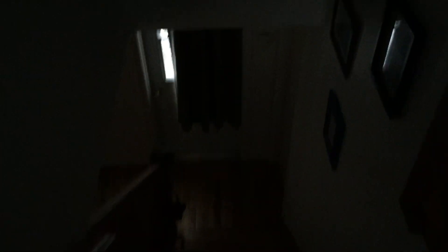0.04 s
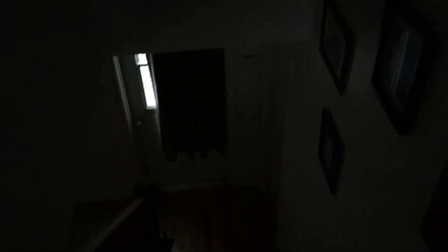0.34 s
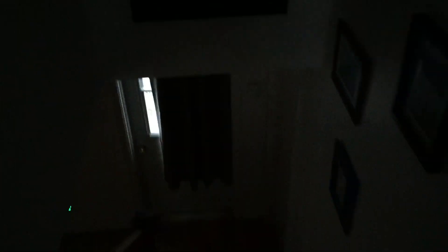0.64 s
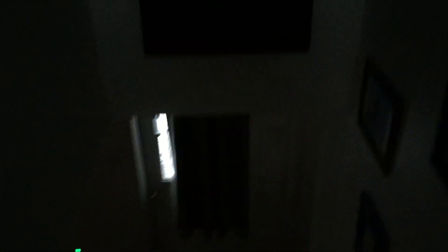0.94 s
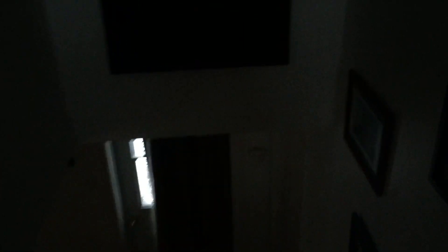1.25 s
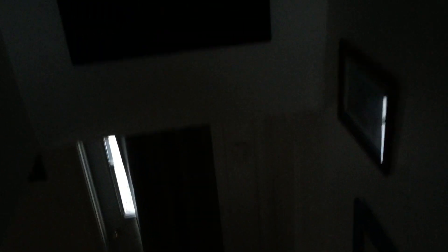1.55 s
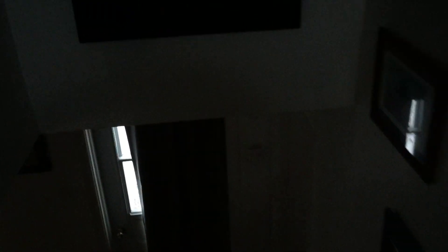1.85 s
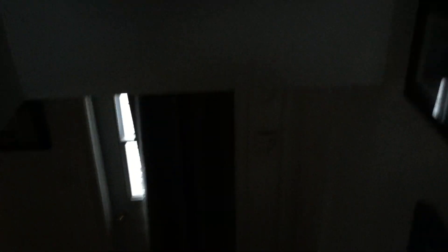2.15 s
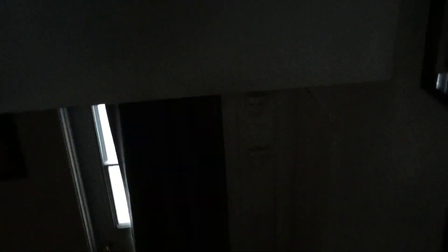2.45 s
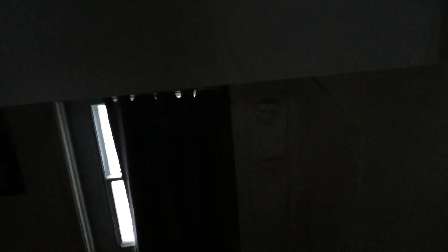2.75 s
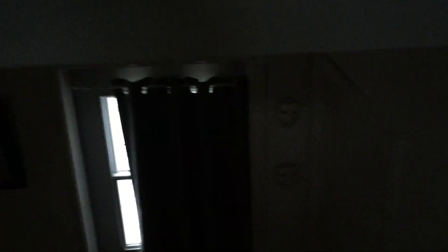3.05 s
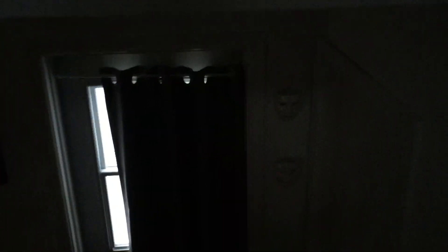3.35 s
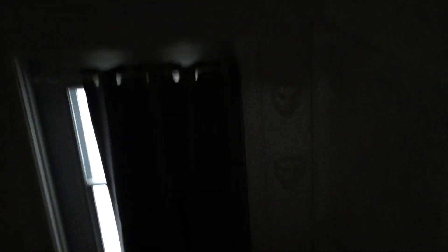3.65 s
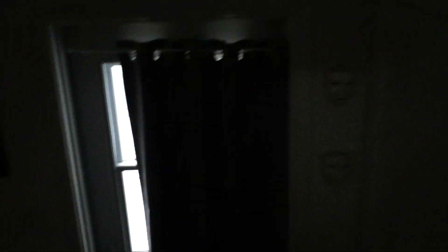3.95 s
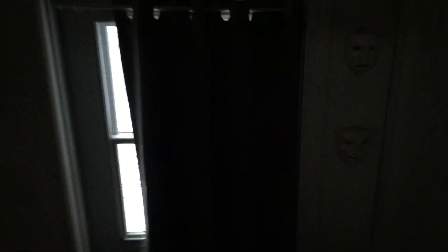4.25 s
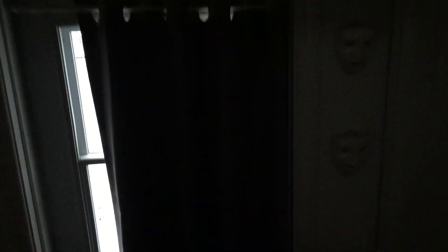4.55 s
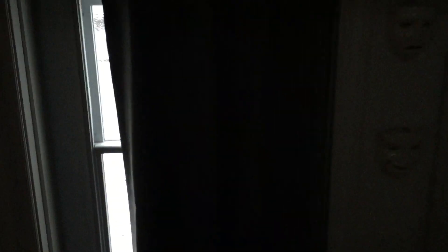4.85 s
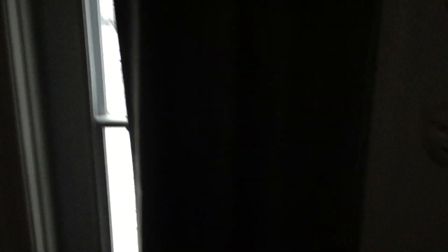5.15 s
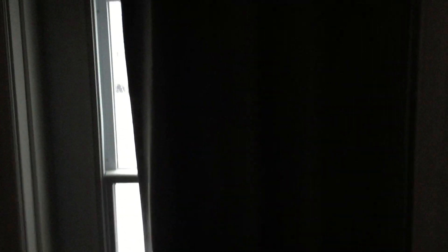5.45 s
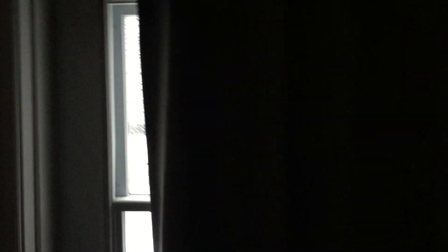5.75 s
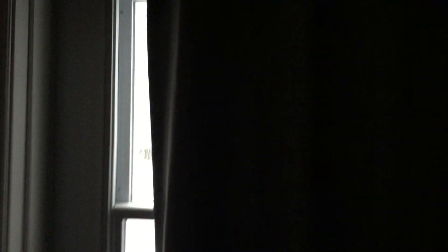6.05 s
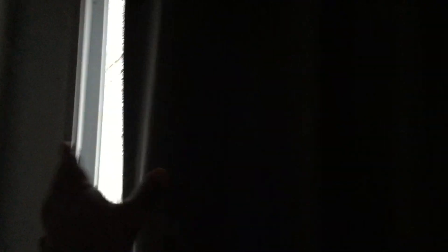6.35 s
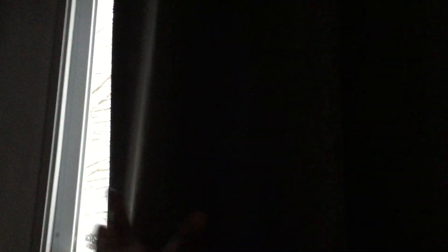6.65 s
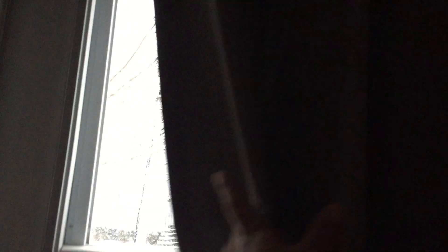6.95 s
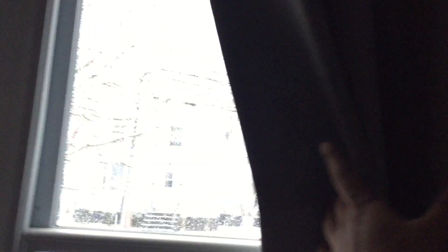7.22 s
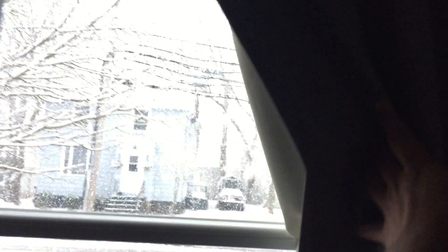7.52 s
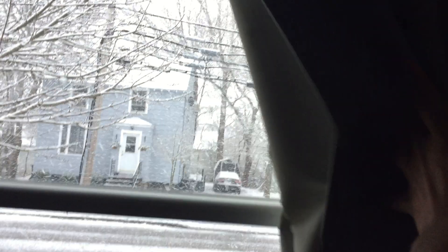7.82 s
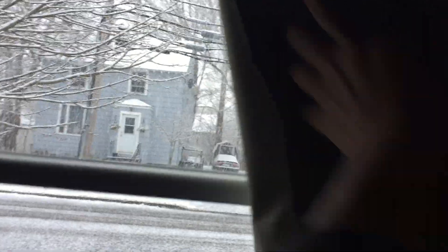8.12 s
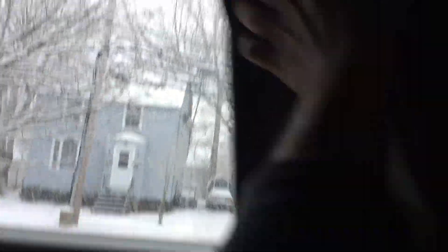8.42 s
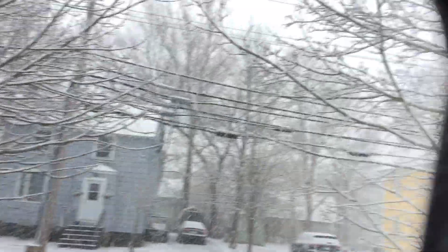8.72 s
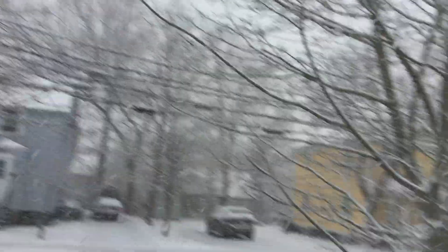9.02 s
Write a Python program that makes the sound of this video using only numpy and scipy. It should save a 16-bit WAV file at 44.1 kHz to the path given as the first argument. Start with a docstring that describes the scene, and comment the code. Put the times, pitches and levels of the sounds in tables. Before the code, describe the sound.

Soft footsteps go down wooden stairs into a hall, about two a second. Each lands with a hollow thud and a knock while the joints tick and creak and soles and clothes swish; heavier steps boom in the floor. Then a hand drags a heavy curtain aside close to the microphone, the cloth hissing and snapping taut, with a few dull knocks behind it. A faint indoor rumble and hiss lies underneath.

```python
"""Soft footfalls thud down wooden stairs into a hall: each step drums a hollow tread and knocks its
board, the joints tick and creak as they slip, soles and clothes swish, and heavy steps boom in the
floor. Then a hand drags a heavy curtain aside: the cloth hisses close by, its folds snap taut and
something behind it rings dully. Under it all lies the faint rumble and hiss of a quiet house."""
import sys
import numpy as np
from scipy import signal
from scipy.fft import rfft, irfft, next_fast_len
from scipy.io import wavfile
from scipy.ndimage import uniform_filter1d, map_coordinates

SR = 44100
rng = np.random.default_rng(int(sys.argv[2]) if len(sys.argv) > 2 else 0)


def int16_out(signal):
    """Quantize to a 16-bit WAV file."""
    q = np.round(np.clip(np.atleast_2d(signal).T, -1, 1) * 32767)
    wavfile.write(sys.argv[1], SR, q.astype(np.int16))


N = 404838

# one stair each, a lighter and a firmer foot taking turns:
# landing t/s, hollow tread/dB, board knock/dB, foot's rub/dB, wait for the other leg/s, its swish/dB
STRIDES = [(.227, -55, -54.5, -92, 0.26, -53), (.814, -50.5, -56, -49.5, .22, -49.5),
           (1.388, -53.5, -54, -83, 0.21, -53), (1.938, -53.5, -58, -55, .211, -55.5),
           (2.434, -66, -58.5, -57.5, 0.23, -51.5), (2.953, -57.5, -55, -51.5, .2, -54.5),
           (3.467, -65, -56.5, -77, 0.22, -52), (3.991, -58.5, -56.5, -54, 0.19, -53),
           (4.457, -58.5, -57, -65.5, 0.16, -49.5), (4.91, -56.5, -59, -51, 0.18, -50),
           (5.381, -67, -58, -62, .182, -50), (5.878, -68, -54, -53.5, 0.21, -53.5),
           (6.401, -53, -53.5, -62, 0.19, -52.5)]
# wood ticking and creaking under the weight, the sharpest rows a hard heel clacking on the wood: t/s, peak/dB,
# pitch/Hz, crack re ring/dB
CREAKS = [(0.326, -38, 2600, -9), (0.858, -39.5, 2680, -11), (0.9327, -28, 1340, -12.5),
          (0.939, -32.5, 940, -25), (1.213, -51.5, 2570, -19), (1.392, -46.5, 712, -31),
          (1.502, -40.5, 2010, -8), (1.724, -43, 1460, -7), (2.019, -36, 1950, -13.5),
          (2.049, -33, 1190, -10), (2.141, -35.5, 1530, -16), (2.556, -41.5, 1120, -17),
          (2.852, -44.5, 1090, -11), (3.004, -42, 2100, -20), (3.021, -40.5, 3530, -24),
          (3.054, -41, 1210, -16), (3.583, -47, 1210, -10), (3.6061, -29.5, 3030, -6),
          (3.610, -24, 2290, 1), (4.0127, -36, 2470, -13), (4.0513, -35.5, 1620, -17),
          (4.136, -37.5, 1100, -29), (4.544, -39.5, 980, -12), (4.964, -37, 1580, -19),
          (5.076, -27.5, 1520, -2.5), (5.724, -42, 2430, -7), (5.936, -29, 1160, 4),
          (6.365, -44, 2190, -22), (6.403, -36.5, 814, -29), (6.813, -49, 1900, -8),
          (6.927, -45.5, 1970, -10)]


def amp(db):
    """Decibels to gain."""
    return 10 ** (np.asarray(db) / 20)


def unit(x):
    """x at rms 1."""
    return x / np.sqrt(np.mean(x ** 2) + 1e-20)


def along(points, hz):
    """A curve of (f/Hz, value) points, read on a log frequency axis."""
    f, values = np.transpose(points)
    return np.interp(np.log(hz + 1), np.log(f + 1), values)


def add(track, s, x):
    """Mix x into the track from time s on."""
    start = round(s * SR)
    x, start = x[max(-start, 0):], max(start, 0)
    track[start:start + len(x)] += x[:N - start]


def wobble(rate, size=N):
    """A smooth random curve, rate knots a second."""
    knots = rng.standard_normal(int(size * rate / SR) + 4)
    return map_coordinates(knots, [np.arange(size) * rate / SR])


def filtered(x, response):
    """x through a complex frequency response."""
    size = next_fast_len(len(x) + SR // 20)
    return irfft(rfft(x, size) * response(np.fft.rfftfreq(size, 1 / SR)), size)[:len(x)]


def coloured(x, spectrum):
    """x through an EQ curve of (f/Hz, level/dB), at rms 1."""
    return unit(filtered(x, lambda hz: amp(along(spectrum, hz))))


def resonate(x, modes):
    """x through resonances of (f/Hz, width/Hz, level/dB), alternating in polarity."""
    return filtered(x, lambda hz: sum(
        (-1) ** k * amp(db) * 1j * hz * width / (centre ** 2 - hz ** 2 + 1j * hz * width)
        for k, (centre, width, db) in enumerate(modes)))


def scattered(x, db, t60):
    """x with the early reflections of nearby surfaces."""
    t = np.arange(SR // 10) / SR
    near = rng.standard_normal(len(t)) * amp(-60 * t / t60) * (t > 1 / 1000)
    return x + amp(db) * signal.fftconvolve(x, near / np.linalg.norm(near))[:len(x)]


def in_hall(x, wet_db):
    """x with the hall's short reverb; the treble dies first."""
    decay = [(60, 0.48), (200, 0.25), (700, 0.33), (2500, 0.31), (6000, 0.24), (14000, 0.17)]  # the hall's reverb time: f/Hz, t60/s
    hz, t, noise = signal.stft(rng.standard_normal(SR // 2), SR, nperseg=256)
    tail = signal.istft(noise * amp(-60 * t / along(decay, hz)[:, None]), SR, nperseg=256)[1]
    tail *= 1 - np.exp(-np.arange(len(tail)) / SR / 0.0045)
    return x + amp(wet_db) * signal.fftconvolve(x, tail / np.linalg.norm(tail))[:len(x)]


def house():
    """The quiet house: a low rumble under a thin hiss, both wavering slightly."""
    room_tone = [(15, -39), (25, 4.5), (69, -5), (227, -11), (305, -15.5), (703, -20), (782, -23),
                 (1300, -24), (1950, -22), (2120, -20.5), (2700, -25.5), (3530, -26.5), (5010, -29.5),
                 (6920, -31), (15500, -37.5)]  # spectrum of the still air: f/Hz, level/dB
    air = coloured(rng.standard_normal(N), room_tone)
    air = filtered(air, lambda hz: hz ** 10 / (hz ** 10 + 38 ** 10))  # steep low cut
    return amp(-67.5 + 0.82 * wobble(2.3)) * unit(air)


def footfall(modes, soft_hz, settle_s, impact):
    """A soft foot lands, then settles on the wood; rms 1 over its first 40 ms."""
    t = np.arange(SR // 6) / SR
    push = rng.standard_normal(len(t)) * np.exp(-(t / settle_s) ** 2)
    push[0] = impact * np.linalg.norm(push)
    # a soft sole passes no sharp edges, and the stiff board hardly follows the slowest push
    push = filtered(push, lambda hz: (1j * hz / (1j * hz + 90)) ** 2 / (1 + 1j * hz / soft_hz) ** 2)
    thud = resonate(push, modes)
    return thud / np.std(thud[:SR // 25])


def footfalls():
    """Every landing and heel drums the hollow tread and knocks its board; the sole adds a dry tap."""
    heels = [(.35, -52, -70), (.43, -58.5, -57.5), (.868, -56, -74), (.924, -45.5, -64), (1.463, -59, -66),
             (1.535, -59.5, -67), (1.622, -58, -66.5), (2.051, -52, -60), (2.148, -48, -52),
             (2.558, -56.5, -73), (2.666, -59.5, -60.5), (3.224, -54, -59.5), (3.611, -49.5, -69),
             (4.14, -60, -58), (4.542, -70, -63.5), (4.975, -57, -55.5), (5.496, -70, -57),
             (5.602, -57, -59.5), (5.722, -71, -58.7), (5.939, -59, -51), (6.812, -80, -61.5)]  # heels coming down: t/s, hollow tread/dB, board knock/dB
    tread_modes = [(169.4, 21, 8), (210.5, 39, -1), (134, 40, -21)]  # the hollow tread's resonances: f/Hz, width/Hz, level/dB
    board_modes = [(280, 36, 2), (366.6, 59, 4.5), (431, 93, 5.5), (610, 194, 1), (685, 134, 0),
                   (1320, 190, -10)]  # the board's resonances: f/Hz, width/Hz, level/dB
    tap_eq = [(200, -38), (700, 1), (1300, -2), (2300, -6), (3200, -11), (5000, -20), (12000, -31)]  # the sole meeting the wood: f/Hz, level/dB
    out, t = np.zeros(N), np.arange(SR // 8) / SR
    tap_envelope = amp(-60 * t / 0.19) * (1 - np.exp(-t / 0.0039))
    for s, tread_db, board_db, *_ in [*STRIDES, *heels]:
        tune = np.exp(0.053 * rng.standard_normal())  # no two stairs ring quite alike
        tread, board = [np.array(modes) * [tune, 1, 1] for modes in (tread_modes, board_modes)]
        add(out, s, amp(tread_db) * footfall(tread, soft_hz=450, settle_s=0.021, impact=1.25))
        add(out, s, amp(board_db) * footfall(board, soft_hz=890, settle_s=0.034, impact=0.71))
        tap = coloured(rng.standard_normal(len(t)), tap_eq) * tap_envelope
        add(out, s, amp(board_db - 1.5) * tap)
    return in_hall(out, wet_db=-7.5)


def ringing(pitch_hz, t60, attack_s):
    """One softly struck mode."""
    t = np.arange(SR // 2) / SR
    return np.sin(2 * np.pi * pitch_hz * t) * amp(-60 * t / t60) * (1 - np.exp(-t / attack_s))


def floor_booms():
    """The floor sags and swings under the heaviest steps, and faintly under every stride."""
    heavy_steps = [(2.792, -55, 60.5), (3.232, -49, 59), (3.618, -42, 60.6), (3.995, -50, 133),
                   (4.542, -53, 140), (5.078, -48, 89), (5.944, -44.5, 56), (6.03, -48, 46.8),
                   (6.425, -38, 64.7), (6.486, -35.5, 43)]  # steps that flex the floor: t/s, level/dB, pitch/Hz
    out = np.zeros(N)
    for s, db, pitch_hz in heavy_steps:
        add(out, s, amp(db) * ringing(pitch_hz, t60=0.21, attack_s=0.00094))
    for s, *_ in STRIDES:
        sway_db = -59 + 0.4 * s  # grows on the way down
        sway_hz = 56 * np.exp(rng.normal(0, 0.14))
        add(out, s, amp(sway_db) * ringing(sway_hz, t60=0.84, attack_s=0.048))
    return out


def click(pitch_hz, crack_db, chatter_s, q, near_db):
    """A sudden slip, peak 1: a jerk and a dying chatter ring briefly under a crack of noise."""
    crack_eq = [(300, -7.5), (800, 4.5), (3000, -2), (4400, -5.5), (5000, -6), (5500, -4), (9000, -13),
                (10400, -11.5), (11400, -15), (15500, -16)]  # the crack of a slip, as coloured by the microphone: f/Hz, level/dB
    t = np.arange(SR // 10) / SR
    jerks = 0.21 * rng.standard_normal(len(t)) * np.exp(-t / chatter_s)
    jerks[0] = 1
    body = [(pitch_hz, pitch_hz / q, 0)]
    ring = resonate(resonate(jerks, body), body)
    crack = coloured(rng.standard_normal(len(t)), crack_eq) * np.exp(-t / (chatter_s + 0.0002))
    slip = scattered(ring / np.abs(ring).max() + amp(crack_db) * crack, near_db, t60=0.069)
    return slip / np.abs(slip).max()


def creaks():
    """The joints of the staircase slip and tick, and a heel now and then clacks hard, each at its own pitch."""
    out = np.zeros(N)
    for s, db, pitch_hz, crack_db in CREAKS:
        add(out, s, amp(db) * click(pitch_hz, crack_db, chatter_s=0.0044, q=1.52, near_db=-4.5))
    return in_hall(out, wet_db=-7.0)


def strokes():
    """All the rubbing of the walk, as rows of peak t/s, rub/dB, hiss re rub/dB, rise/s, fall/s."""
    strays = [(.328, -54.5, -18, 0.025, 0.048), (1.25, -72, -7, .015, .1), (2.482, -64, -11.5, 0.047, .055),
              (3.372, -68.5, -4, 0.011, 0.026), (3.557, -61, -18, 0.0083, 0.015),
              (3.625, -46.5, -9.5, 0.0057, 0.036), (4.945, -58, -9, 0.0067, 0.011),
              (5.08, -48.5, -11, 0.0083, 0.016), (6.425, -61, -10, 0.019, 0.064)]  # odd scuffs: peak t/s, rub/dB, hiss re rub/dB, rise/s, fall/s
    # the lighter foot's trouser leg brushes by before it lands; the firmer foot's sole slides after
    brushes = [(s - 0.038, db, -4, 0.016, 0.011) for s, _, _, db, _, _ in STRIDES[::2]]
    scuffs = [(s + 0.088, db, -21, 0.028, 0.041) for s, _, _, db, _, _ in STRIDES[1::2]]
    passing_legs = [(s + wait, db, -10, 0.026, 0.022) for s, _, _, _, wait, db in STRIDES]
    grinding_joints = [(s, db - 25.5, -12, 0.0065, 0.017) for s, db, _, _ in CREAKS]
    return brushes + scuffs + passing_legs + grinding_joints + list(strays)


def swishes():
    """Soles slide and trouser legs brush: each stroke of gritty noise swells and fades."""
    rub_eq = [(100, -3), (300, 2), (700, -6), (1000, -5.5), (1350, -2), (1850, -2), (2300, -1),
              (3200, -6.5), (4400, -6.5), (5000, -14), (5500, -10.5), (8000, -27.5), (15000, -56)]  # the body of a sliding sole: f/Hz, level/dB
    hiss_eq = [(2000, -37), (4000, -16), (5600, 1.5), (7000, -0.5), (9300, -0.5), (10400, -8.5),
               (11400, -2.5), (15500, -5.5)]  # cloth hiss, as coloured by the microphone: f/Hz, level/dB
    out, lead_s = np.zeros(N), 0.3
    t = np.arange(SR * 2 // 3) / SR - lead_s
    for s, rub_db, hiss_db, rise, fall in strokes():
        swell = 1 / np.cosh(np.clip(t / np.where(t < 0, rise, fall), -20, 20)) ** 1.31
        grit = unit(amp(2.8 * wobble(420, size=len(t))))  # the sole catches and lets go
        rub = amp(rub_db) * grit * coloured(rng.standard_normal(len(t)), rub_eq)
        cloth_grip = amp(3.3 * wobble(300, size=len(t)))
        hiss = amp(rub_db + hiss_db) * cloth_grip * coloured(rng.standard_normal(len(t)), hiss_eq)
        add(out, s - lead_s, scattered(swell * (rub + hiss), db=-4.5, t60=0.055))
    return in_hall(out, wet_db=-13.0)


def pull_levels():
    """Rub, hiss and flap envelopes in dB: each pull starts, holds and dies away, and tugs swell it."""
    # the hand's pulls on the curtain: start/s, end/s, rise/s, rub/dB, hiss/dB, flap/dB
    pulls = [(6.79, 7.13, 0.064, -65.5, -69, -69.5), (7.15, 7.306, 0.084, -45.5, -52.5, -61),
             (7.37, 7.818, 0.032, -51, -52, -66.5), (7.907, 8.05, 0.013, -46.5, -52, -55.5),
             (8.166, 8.263, .008, -51, -48.5, -80), (8.25, 8.51, 0.044, -49.5, -51, -80),
             (8.53, 9.06, 0.039, -44.5, -52, -57)]
    tugs = [(7.195, 2, .015), (7.285, 4.5, 0.036), (7.795, 8, 0.053), (7.96, 4, 0.016), (8.02, 3, 0.045),
            (8.255, 2, .03), (8.565, 3.5, 0.011), (8.865, 4, 0.072)]  # the cloth tightening in a pull: peak t/s, extra rub/dB, half width/s
    release_s, tug_shares = 0.15, [1, 0.55, 2.06]  # shares for rub, hiss, flap
    t = np.arange(N) / SR
    power = np.full((3, N), 1e-12)
    for start, end, rise, *levels_db in pulls:
        attack = 1 - np.exp(-np.maximum(t - start, 0) / rise)
        release = np.exp(-np.maximum(t - end, 0) / release_s)
        power += np.outer(amp(levels_db), attack * release) ** 2
    tug_db = sum(db * np.exp(-((t - s) / width) ** 2) for s, db, width in tugs)
    return 10 * np.log10(power) + np.outer(tug_shares, tug_db)


def friction(spectrum, catches_per_s, grain_db):
    """Rubbing fibres: smooth noise plus a grain of tiny catches."""
    grains = np.sign(rng.standard_normal(N)) * (rng.random(N) < catches_per_s / SR)
    return coloured(rng.standard_normal(N) + amp(grain_db) * unit(grains), spectrum)


def shifting_folds(x, hump_db, octaves, patchy_db):
    """The colour of moving cloth: a broad hump that follows the fold, and passing patches."""
    fold_pitch = [(7.2, 2200), (7.35, 1280), (7.5, 620), (7.8, 1110), (8.0, 1290), (8.26, 950), (8.5, 1140),
                  (8.6, 2500), (8.8, 1920), (9.1, 740)]  # the size of the rubbed fold sets its pitch: t/s, f/Hz
    hz, t, bands = signal.stft(x, SR, nperseg=512)
    centre_hz = np.interp(t, *np.transpose(fold_pitch))
    hump = np.exp(-(np.log2((hz[:, None] + 1) / centre_hz) / octaves) ** 2)
    patches = uniform_filter1d(rng.standard_normal(bands.shape), size=4, axis=0)
    patches = unit(uniform_filter1d(patches, size=12, axis=1))
    bands = bands * amp(hump_db * hump + patchy_db * patches)
    return unit(signal.istft(bands, SR, nperseg=512)[1][:N])


def curtain_cloth():
    """Heavy cloth slides through the hand, close and dry: it rubs, hisses and flaps."""
    rub_eq = [(200, -18), (450, -6.5), (750, -1.5), (1250, -4), (1800, -5), (2500, -3), (3300, -7),
              (4300, -8), (5000, -12), (5500, -10), (8000, -17.5), (15000, -55)]  # folds rubbing: f/Hz, level/dB
    hiss_eq = [(400, -50), (1000, 4), (4000, -6), (5000, -16.5), (5700, -5.5), (7500, -4.5), (9300, 0),
               (10400, -6.5), (11400, -1.5), (15500, -7)]  # cloth hiss, as coloured by the microphone: f/Hz, level/dB
    flap_eq = [(25, -35), (45, 0.5), (100, -8.5), (200, -5.5), (380, -1.5), (520, -4.5), (900, -24),
               (3000, -70)]  # the low flapping of the curtain: f/Hz, level/dB
    rub_db, hiss_db, flap_db = pull_levels()
    grip = wobble(45)  # the cloth sticks and gives
    folds = friction(rub_eq, catches_per_s=1500, grain_db=-13.0)
    rub = amp(rub_db + 2.3 * grip) * shifting_folds(folds, hump_db=3, octaves=0.93, patchy_db=2.5)
    hiss = amp(hiss_db + 0.5 * grip) * friction(hiss_eq, catches_per_s=5000, grain_db=-2.5)
    flap = amp(flap_db + 0.6 * wobble(25)) * coloured(rng.standard_normal(N), flap_eq)
    return rub + hiss + flap


def curtain_knocks():
    """Folds snap taut, and something behind the curtain rings dully."""
    snaps = [(7.034, -39, 2330, -11, 0.016), (7.249, -24, 1530, -10, 0.00072),
             (7.269, -32.5, 1970, -20, .003), (7.392, -24, 2160, -27, 0.002),
             (7.9845, -20, 2340, -21, 0.0034), (7.988, -24, 1330, -21, 0.0051),
             (8.8961, -12.5, 2670, -6.5, 0.0025), (8.92, -23.5, 1870, -1, 0.0033)]  # snapping folds: t/s, peak/dB, pitch/Hz, crack re ring/dB, chatter/s
    bumps = [(7.402, -34, 456, 0.044), (7.498, -36, 467, 0.04), (7.931, -40, 190, 0.066),
             (7.99, -38, 256, 0.077), (8.115, -45.5, 384, 0.21), (8.624, -42, 228, 0.4),
             (8.805, -40.5, 401, 0.17), (8.842, -27, 374, 0.082), (8.901, -46, 149, 0.14)]  # dull rings: t/s, level/dB, pitch/Hz, t60/s
    out = np.zeros(N)
    for s, db, pitch_hz, crack_db, chatter_s in snaps:
        add(out, s, amp(db) * click(pitch_hz, crack_db, chatter_s, q=1.68, near_db=-6))
    for s, db, pitch_hz, t60 in bumps:
        add(out, s, amp(db) * ringing(pitch_hz, t60, attack_s=0.0029))
    return in_hall(out, wet_db=-14.0)


def scene():
    """The walk, the curtain and the room tone, in mono on both channels."""
    walk = footfalls() + creaks() + swishes() + floor_booms()
    mono = walk + curtain_cloth() + curtain_knocks() + house()
    return np.array([mono, mono])


def record(dry):
    """The microphone sheds the deepest bass and the very top of the treble."""
    low_hz, top_hz = 39, 15800
    bass_cut = signal.sosfilt(signal.butter(10, low_hz, "high", fs=SR, output="sos"), dry)
    return np.array([filtered(channel, lambda hz: hz < top_hz) for channel in bass_cut])


dry = scene()
out = record(dry)
int16_out(out)
```